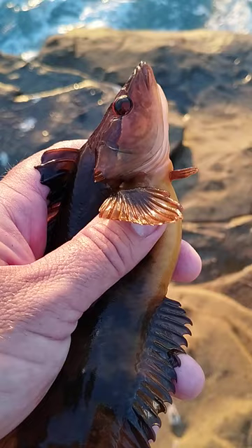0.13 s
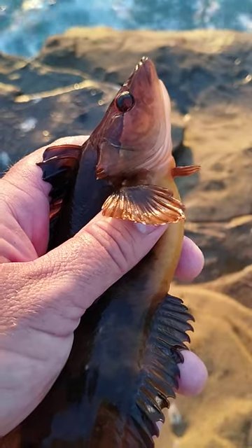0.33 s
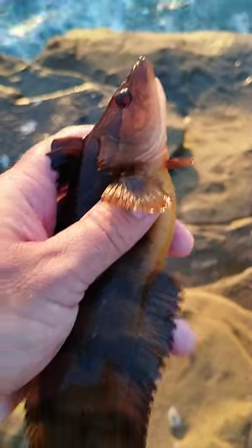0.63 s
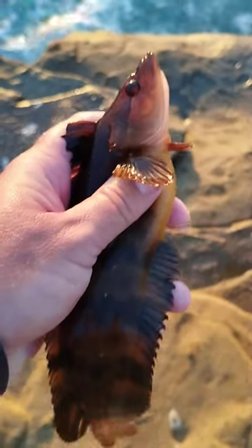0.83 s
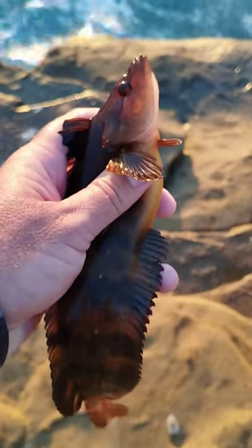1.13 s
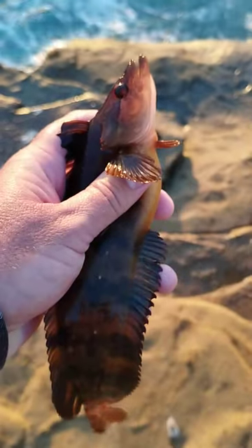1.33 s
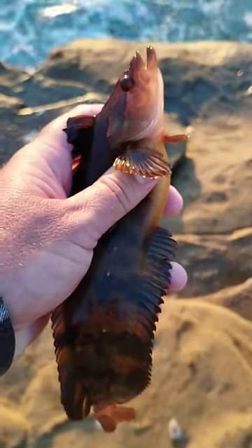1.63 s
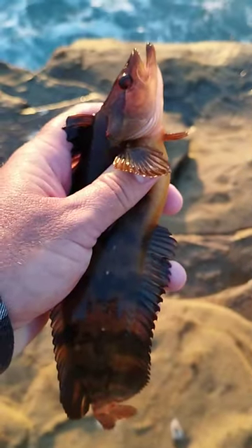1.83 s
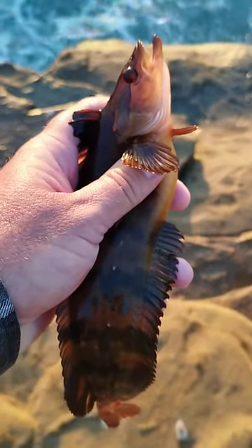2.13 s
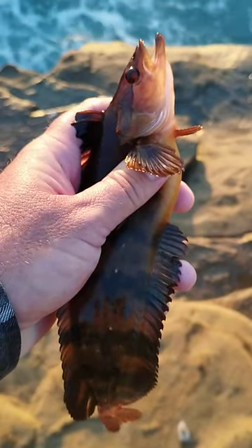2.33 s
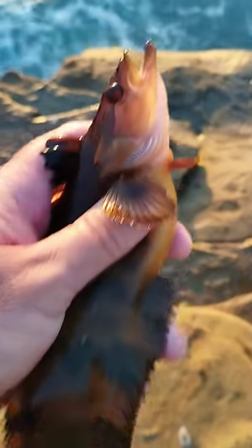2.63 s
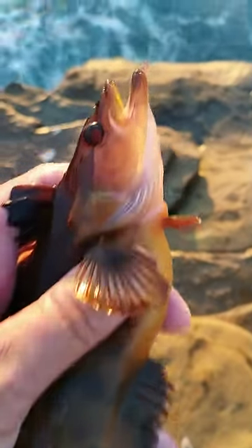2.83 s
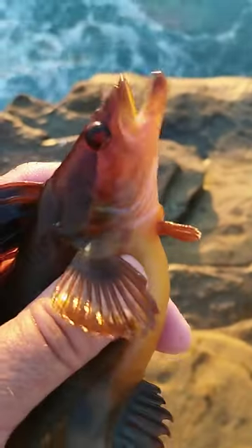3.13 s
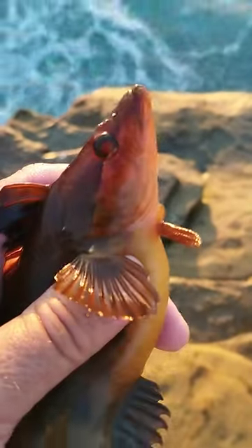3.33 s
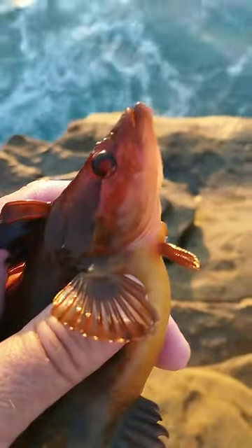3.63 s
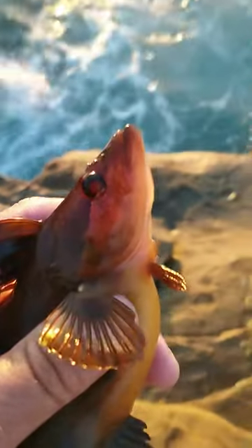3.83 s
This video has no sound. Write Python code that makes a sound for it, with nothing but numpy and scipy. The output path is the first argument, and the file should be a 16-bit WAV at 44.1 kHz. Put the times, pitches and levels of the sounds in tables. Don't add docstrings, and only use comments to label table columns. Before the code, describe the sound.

Steady ocean surf churning against rocks, swelling into a thumping, splashing wave with hissing drops

```python
import sys
import numpy as np
from scipy import signal
from scipy.fft import rfft, irfft
from scipy.io import wavfile
from scipy.ndimage import uniform_filter1d

SR = 44100
rng = np.random.default_rng(int(sys.argv[2]) if len(sys.argv) > 2 else 0)


def convert_level_to_amplitude(level_db):
    exponent = np.asarray(level_db, float) / 20
    return 10 ** exponent


def inscribe(sig):
    pcm = np.round(np.clip(np.atleast_2d(sig).T, -1, 1) * 32767)
    wavfile.write(sys.argv[1], SR, pcm.astype(np.int16))


N = 176400
T = np.arange(N) / SR
HZ = np.maximum(np.arange(N // 2 + 1) * SR / N, 1)
CUTOFF_HZ = 15740

# (time [s], level [dB])
CHURN_LEVEL = [(0.4, -31.5), (0.68, -29.5), (0.91, -31), (0.99, -31), (2.46, -29), (2.51, -25), (2.67, -26),
               (2.68, -33.5), (2.72, -26.5), (2.93, -27.5), (3.13, -28), (3.2, -30), (3.25, -28.5),
               (3.78, -22.5), (3.9, -27), (4.0, -24)]


def rms_one(x):
    return x / np.sqrt(np.mean(x ** 2) + 1e-20)


def in_time(rows):
    return np.interp(T, *np.transpose(rows))


def at_hz(rows, axis=1):
    rows = np.array(rows)
    return np.interp(np.log(HZ), np.log(rows[:, 0]), rows[:, axis])


def drift(rate):
    step, settle = 40, 2000
    r = np.exp(-2 * step * np.pi * rate / SR)
    noise = rng.standard_normal(N // step + settle + 2)
    slow = signal.lfilter([1], [1, -2 * r, r * r], noise)[settle:]
    return np.interp(np.arange(N) / step, np.arange(len(slow)), rms_one(slow))


def at_ports(first, second):
    # (frequency [Hz], coherence [0-1], phase [rad])
    coherence = [(120, .993, .05), (280, .97, .12), (420, .85, .2), (750, .3, .2), (950, .42, -.7),
                 (2300, .4, -.8), (3300, .27, -3.3), (6500, .1, -7.5)]
    a, b = rfft(first), rfft(second)
    alike = np.clip(at_hz(coherence), 0, .999)
    turn = np.exp(1j * at_hz(coherence, axis=2))
    return np.array([a, alike * turn * a + np.sqrt(1 - alike ** 2) * b])


def churn(colour, shared_db, own_db, rate):
    spectrum = at_ports(*rng.standard_normal((2, N))) * convert_level_to_amplitude(at_hz(colour))
    low, high = colour[0][0], colour[-1][0]
    spectrum = spectrum / np.sqrt(1 + (low / HZ) ** 6) / np.sqrt(1 + (HZ / high) ** 8)
    place = 2 * np.log2(HZ / low)
    last = int(2 * np.log2(high / low))
    together = drift(rate) + .5 * drift(rate * 4)
    below = drift(rate)
    out = 0
    for k in range(last + 1):
        share = np.clip(1 - np.abs(np.clip(place, 0, last) - k), 0, 1)
        fresh = drift(rate * 2)
        flicker = convert_level_to_amplitude(shared_db * together + own_db * (fresh + below))
        out = out + flicker * irfft(spectrum * share, N)
        below = fresh
    return rms_one(out)


def grains(rate, low_hz, high_hz, cycles, spread):
    size = convert_level_to_amplitude(spread * np.minimum(rng.exponential(1, (2, N)), 4))
    sign = rng.choice([-1, 1], (2, N))
    clicks = size * sign * (rng.random((2, N)) < rate / SR)
    dealt = rng.integers(0, 16, N)
    out = 0
    for k, hz in enumerate(np.geomspace(low_hz, high_hz, 16)):
        r = convert_level_to_amplitude(-60 * hz / (cycles * SR))
        w = 2 * np.pi * hz / SR
        ring = [1, -2 * r * np.cos(w), r * r]
        out = out + signal.lfilter([0, np.sin(w)], ring, clicks * (dealt == k) + 1e-18)
    return rms_one(irfft(at_ports(*out), N))


def foam():
    # (frequency [Hz], density [dB per Hz])
    roar_colour = [(59, -10), (100, -14.5), (188, -4), (304, -1.5), (461, -7), (513, -9), (563, -9),
                   (2060, -26), (4000, -38), (5200, -69), (8800, -120)]
    bubbles_per_s, bubble_db = 400, -11
    db = in_time(CHURN_LEVEL)
    bubbles = grains(bubbles_per_s * convert_level_to_amplitude(db - db.mean()), 207, 1840, cycles=9.0, spread=5.3)
    roar = churn(roar_colour, shared_db=0.67, own_db=0.53, rate=7.2)
    return convert_level_to_amplitude(db) * (roar + convert_level_to_amplitude(bubble_db) * bubbles)


def spray():
    # (time [s], level [dB])
    spray_level = [(0.4, -49.5), (1.06, -46.5), (1.71, -49), (2.41, -47.5), (2.48, -45), (2.62, -46.5),
                   (2.645, -44), (2.67, -45.5), (3.18, -45.5), (3.22, -41), (3.32, -40), (3.39, -36),
                   (3.45, -38), (3.55, -38), (3.67, -38), (3.7, -41), (3.85, -41.5), (4.0, -41)]
    # (frequency [Hz], density [dB per Hz])
    far_colour = [(900, 3.5), (2300, -3), (3400, 0), (4900, 1), (7200, -9), (9800, -13.5), (13000, -9.5),
                  (16000, -10.5)]
    # (frequency [Hz], density [dB per Hz])
    sheet_colour = [(1500, 2), (2500, -8.5), (3700, -0.5), (4800, -1.5), (6500, -8), (9500, -15),
                    (13000, -8.5), (16000, -10.5)]
    drops_per_s, drop_db = 1900, -7.5
    sheet_from_db, sheet_lean_db = -44, -0.5
    db = in_time(spray_level)
    drop_rate = drops_per_s * convert_level_to_amplitude(db - db.mean() + 3.0 * drift(12.0))
    drops = grains(drop_rate, 2270, 5900, cycles=3.4, spread=1.4)
    far = convert_level_to_amplitude(np.minimum(db, sheet_from_db))
    near = np.sqrt(convert_level_to_amplitude(db) ** 2 - far ** 2 + 1e-12)
    near = near * convert_level_to_amplitude([[sheet_lean_db], [0]])
    hiss = far * churn(far_colour, shared_db=0.27, own_db=0.0, rate=8.0)
    hiss = hiss + near * churn(sheet_colour, shared_db=.3, own_db=.3, rate=25.0)
    return convert_level_to_amplitude(4) * (hiss + convert_level_to_amplitude(db + drop_db) * drops)


def hollows():
    # (time [s], level [dB], length [s], pitch [Hz])
    slams = [(0.731, -37, 0.025, 70), (0.999, -30.5, 0.032, 59.7), (2.525, -26, .018, 52),
             (2.54, -24.5, 0.035, 138), (2.59, -22.5, 0.019, 62.5), (2.768, -28.5, 0.019, 58.7),
             (2.962, -21.5, 0.027, 64.6), (3.022, -25, 0.016, 63.4), (3.071, -25, 0.023, 73),
             (3.197, -22.5, 0.022, 62.6), (3.259, -24, .011, 56.7), (3.442, -26.5, .025, 84.5),
             (3.56, -27.5, 0.013, 62), (3.645, -24.5, 0.026, 101), (3.709, -23.5, .014, 58),
             (3.906, -24, 0.021, 91)]
    # (frequency [Hz], density [dB per Hz])
    rumble_colour = [(11, -41), (18, -3), (65, 0), (97, -3), (141, -5), (171, -11), (373, -13.5),
                     (500, -15.5), (650, -88), (1100, -120)]
    swell_db, swell_follows = -31.5, 1.3
    slam_noise_db = -3.5
    db = in_time(CHURN_LEVEL)
    power = convert_level_to_amplitude(swell_db + swell_follows * (db - db.mean())) ** 2
    tones = 0
    for s, level_db, length, hz in slams:
        shape = convert_level_to_amplitude(level_db) * np.exp(-((T - s) / length) ** 2 / 2)
        power = power + (convert_level_to_amplitude(slam_noise_db) * shape) ** 2
        cycle = hz * (T - s) + rng.random()
        tones = tones + np.sqrt(2) * shape * np.sin(2 * np.pi * cycle)
    rumble = churn(rumble_colour, shared_db=2.5, own_db=0.1, rate=15.0)
    return np.sqrt(power) * rumble + tones


def scene():
    return foam() + spray() + hollows()


def port_colour(dry):
    # (frequency [Hz], width [Hz], left [dB], right [dB])
    port_dips = [(8210, 870, -9.5, -13.5), (11300, 750, -5.5, -21), (2810, 880, 5, -2)]
    # (frequency [Hz], level difference [dB])
    lean = [(200, -.5), (340, -2.5), (600, -5), (2300, -2.5), (4700, -3), (7000, 1), (9500, 9.5),
            (15500, 13.5)]
    db = at_hz(lean) * np.array([[.5], [-.5]])
    for hz, width_hz, left_db, right_db in port_dips:
        db = db + np.array([[left_db], [right_db]]) / (1 + (2 * (HZ - hz) / width_hz) ** 2)
    return irfft(rfft(dry) * convert_level_to_amplitude(db) * (HZ < CUTOFF_HZ), N)


def gate(x):
    from_hz, gate_db = 7600, -12
    hz, _, z = signal.stft(x, SR, nperseg=2048)
    power = np.abs(z) ** 2
    treble = (hz > from_hz) & (hz < CUTOFF_HZ)
    left = uniform_filter1d(power[0, treble].mean(axis=0), size=5)
    right = uniform_filter1d(uniform_filter1d(power[1], size=9, axis=0), size=2, axis=1)
    keep = (right > left * convert_level_to_amplitude(2 * gate_db)) | ~treble[:, None]
    z = z * np.array([np.ones_like(keep), keep])
    return signal.istft(z, SR, nperseg=2048)[1][:, :N]


def settling_offset(u):
    dip_s, rise_s, fall_s = .007, .035, .14
    dips, tops = np.array([[-.055], [-.035]]), np.array([[.042], [.115]])
    after = np.maximum(u, 0)
    swing = (1 - np.exp(-after / rise_s)) * np.exp(-(after / fall_s) ** 1.5 / 2)
    return dips * np.exp(-(u / dip_s) ** 2 / 2) + tops * swing * .75


def low_pass(x):
    return signal.sosfilt(signal.butter(12, 16330, fs=SR, output="sos"), x)


def record(dry):
    open_s, right_late_s, fade_s = 0.1402, 0.0014, 0.0013
    gain_start_db, gain_full_s = -6.5, 0.3
    bass_cut_hz, offset_s = 87, .322
    x = gate(port_colour(dry))
    wind_filter = signal.butter(3, bass_cut_hz, "high", fs=SR, output="sos")
    thin = signal.sosfilt(wind_filter, x)
    u = T - offset_s
    x = thin + (x - thin) * np.clip(u / .02, 0, 1)
    gain = convert_level_to_amplitude(np.interp(T, [open_s, gain_full_s], [gain_start_db, 0]))
    opening = np.clip((T - open_s - np.array([[0], [right_late_s]])) / fade_s, 0, 1)
    x = x * gain * opening + settling_offset(u)
    return low_pass(x)


dry = scene()
out = record(dry)
inscribe(out)
```